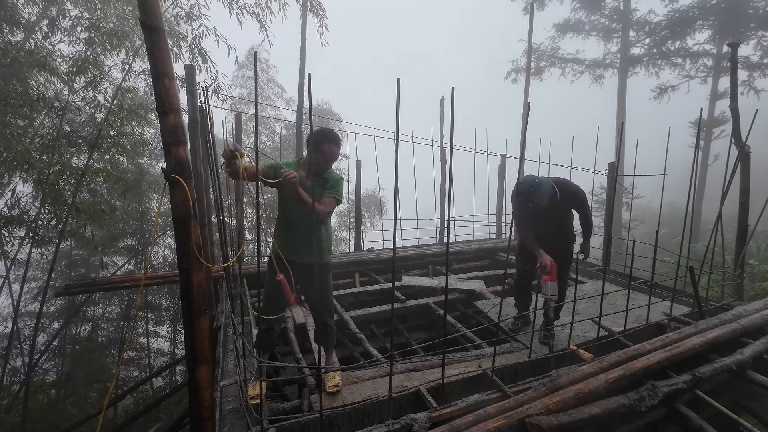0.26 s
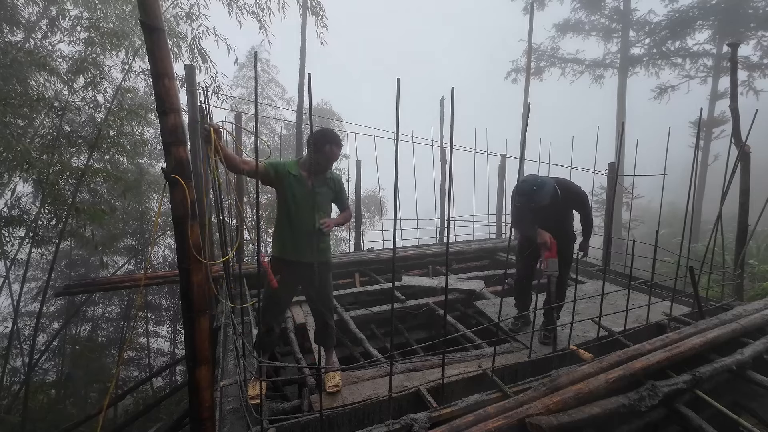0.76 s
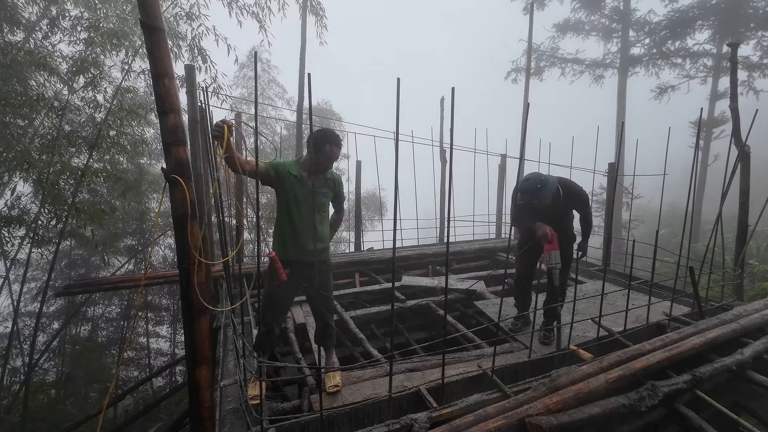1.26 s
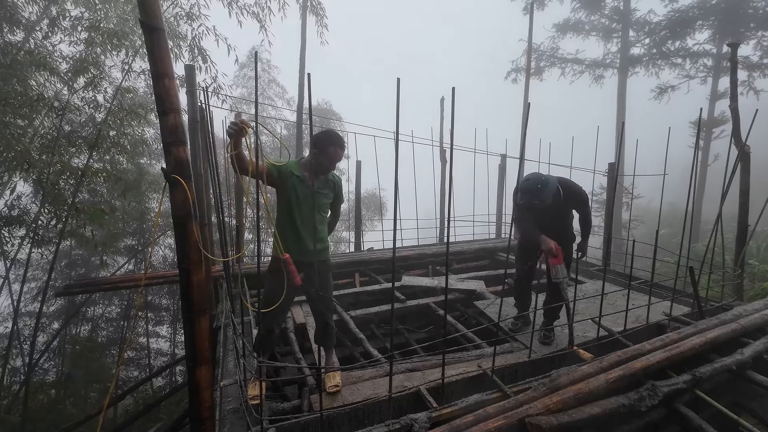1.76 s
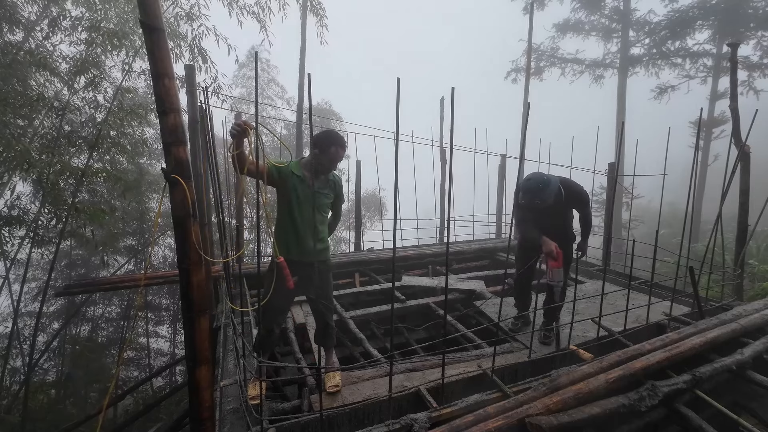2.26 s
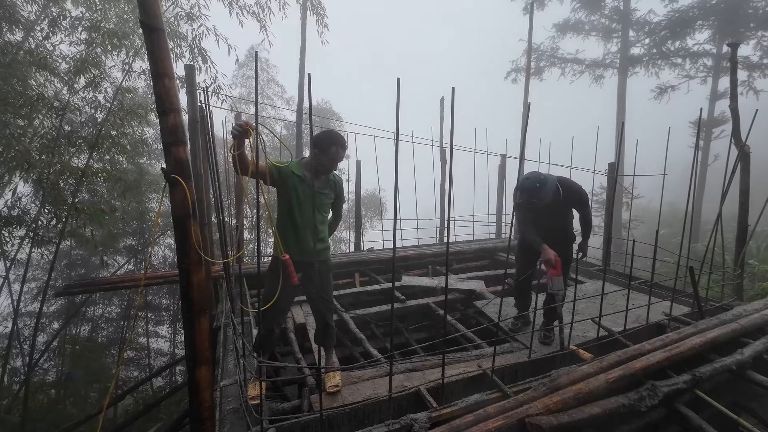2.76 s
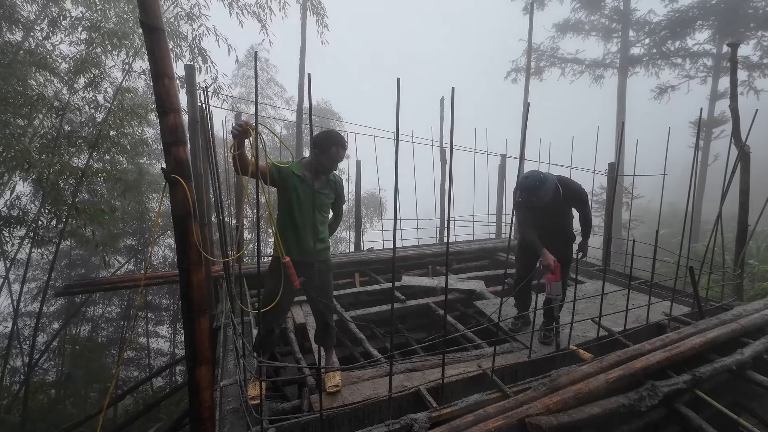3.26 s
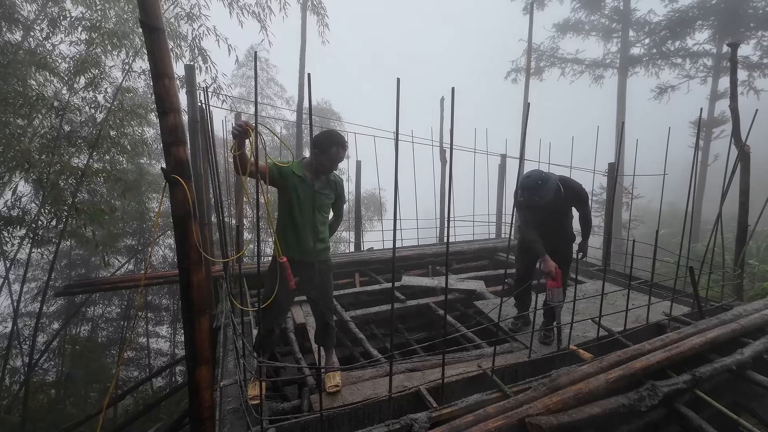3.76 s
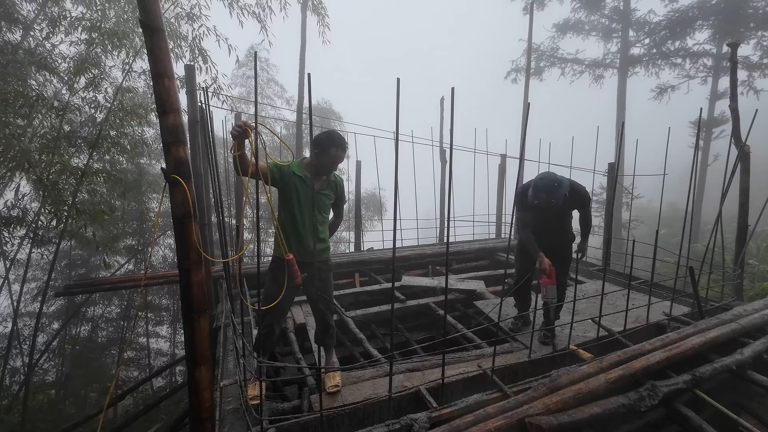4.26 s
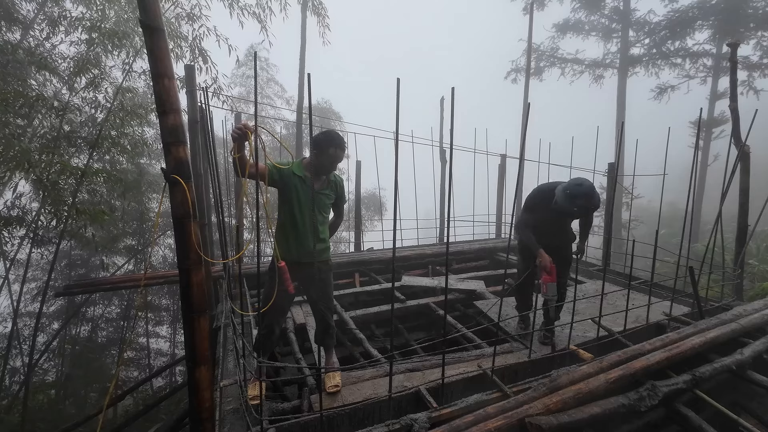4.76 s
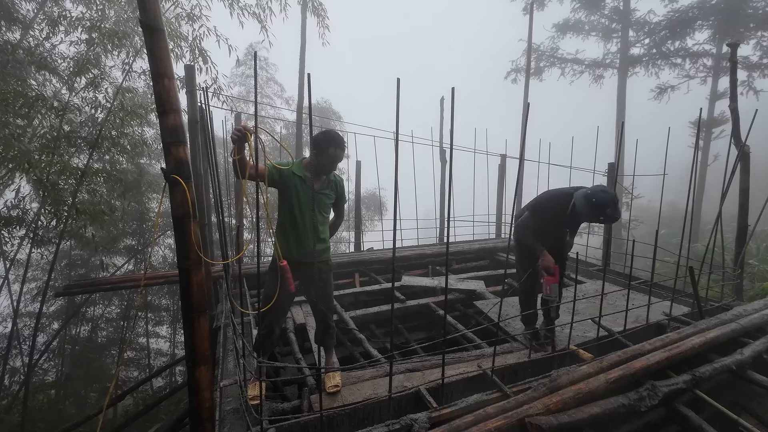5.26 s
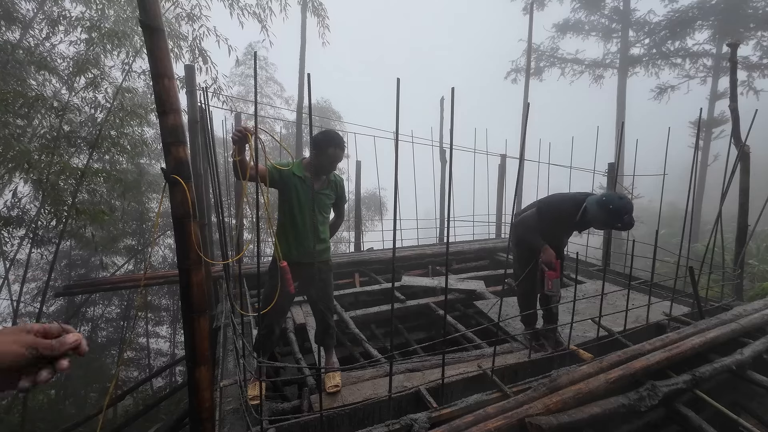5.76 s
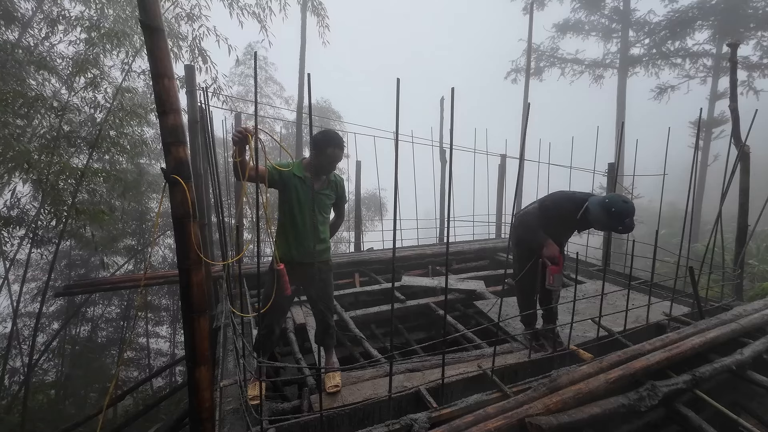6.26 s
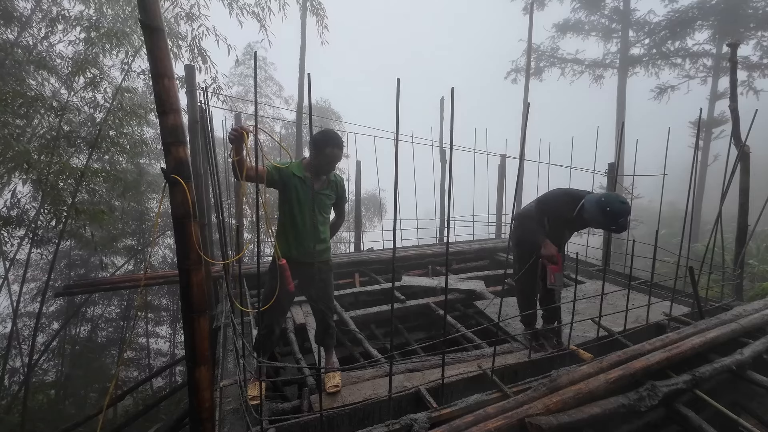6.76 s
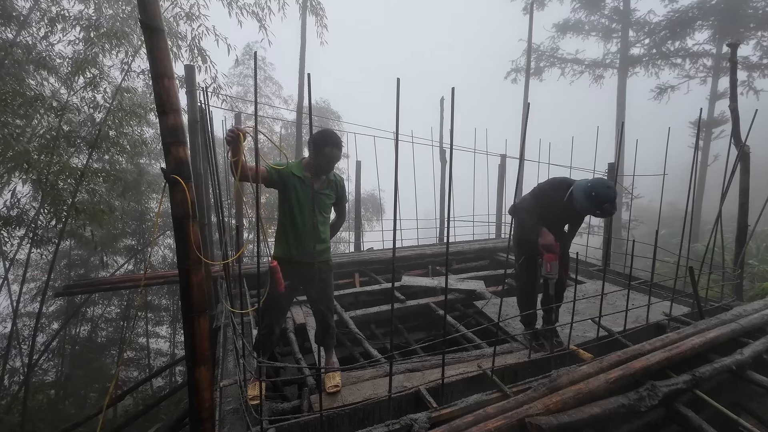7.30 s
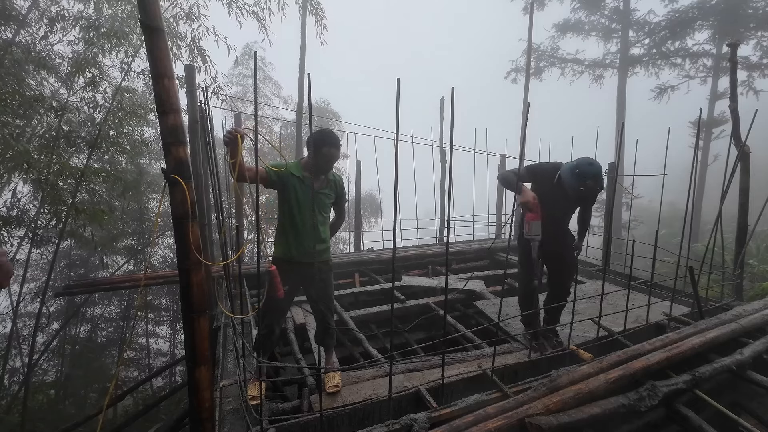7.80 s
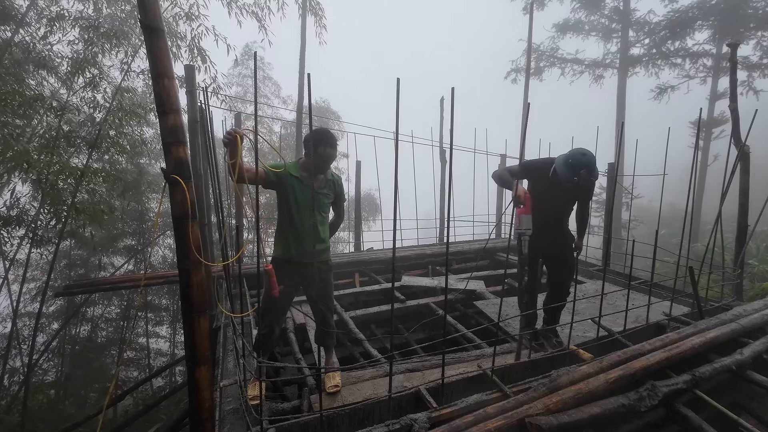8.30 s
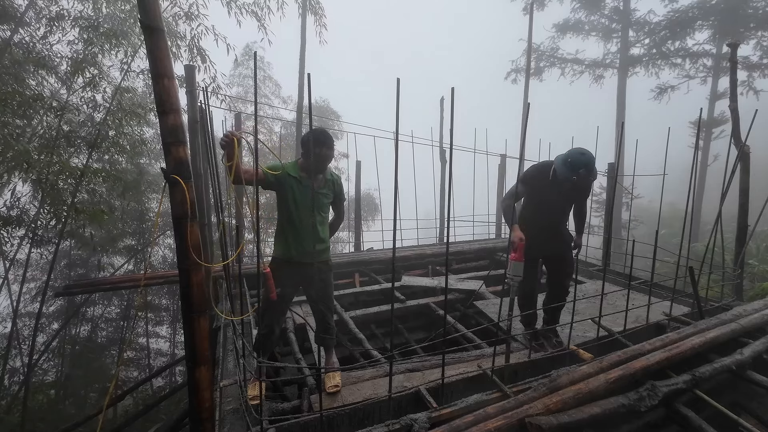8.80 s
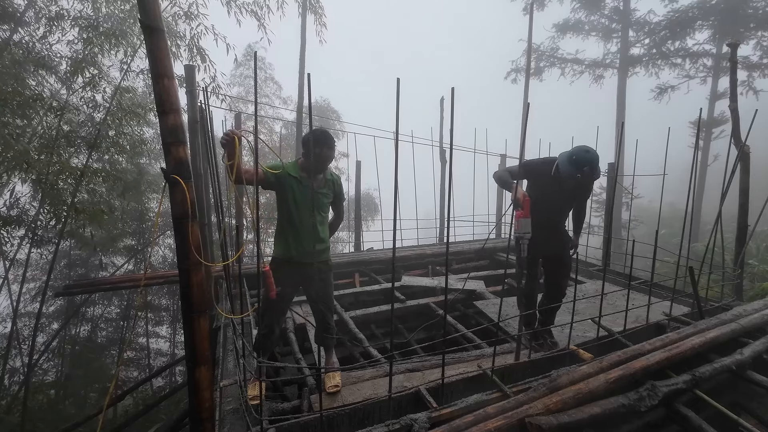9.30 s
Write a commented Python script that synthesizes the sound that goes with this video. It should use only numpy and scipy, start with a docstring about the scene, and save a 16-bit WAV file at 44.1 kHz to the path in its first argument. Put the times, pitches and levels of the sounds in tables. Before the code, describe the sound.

Repeated whining surges of a concrete vibrator, with low formwork hum, later harsh hissing rasp, rattling metal and a small engine chugging farther off outdoors.

```python
"""A handheld electric concrete vibrator is already running, the first of six pulls on its trigger. Its
eccentric shaft runs up, coasts down and hums where it touches the formwork; the geared armature whines, the
brushes hiss and squeal, and rasping bands shift in pitch once the tool is raised. A small single-cylinder
engine chugs steadily further off, with light metal jingling in time. Loose metal rattles, dull knocks on the
boards and faint outdoor air complete the building site."""
import sys
import numpy as np
from scipy import signal
from scipy.fft import rfft, irfft, next_fast_len
from scipy.io import wavfile
from scipy.ndimage import uniform_filter1d

SR = 44100
rng = np.random.default_rng(int(sys.argv[2]) if len(sys.argv) > 2 else 0)


def digitize_waveform(pressure):
    """Quantize a signal to 16-bit integers and store it at the path in sys.argv[1].

    Rows of a 2-D input are taken as channels; values are limited to [-1, 1].
    """
    field = np.atleast_2d(pressure).T
    bounded = np.clip(field, -1, 1)
    quanta = np.round(bounded * 32767).astype(np.int16)
    wavfile.write(sys.argv[1], SR, quanta)


N = 420713

# spectrum of ringing light metal: pitch_hz, relative_db
METAL_SPECTRUM = [(500, -10.5), (2800, -7), (4300, 2), (5500, -1.5), (6600, 4), (8000, 7.5), (9500, -4.5),
                  (15000, -23)]
# trigger pulls: on_s, off_s, shaft_hz reached at release;
# at REFERENCE_HZ and before trims: brush_db, air_db, squeal_db, whine_db;
# growth with speed: noise_db_per_octave, whine_db_per_octave
TRIGGER_PULLS = [(-0.16, 0.369, 217, -35, -37.5, -37, -35, 5.5, 28),
                 (1.835, 2.064, 190.6, -35, -38, -37, -40, 6.5, 28),
                 (2.745, 3.062, 211.3, -37, -38, -36, -37.5, 4.3, 28),
                 (6.15, 6.679, 218.9, -31, -37.5, -36.5, -49, 12, 24),
                 (7.27, 7.358, 196.2, -32.5, -42, -35, -29, 5, 40),
                 (8.58, 9.52, 244, -32, -49, -47, -38.5, 10.3, 44)]
GEAR_RATIO = 7.34  # armature turns per shaft turn


def undb(db):
    """Decibels to gain."""
    return np.exp(np.asarray(db) * (np.log(10) / 20))


def unit(x):
    """Scale to rms 1."""
    return x / np.sqrt(np.mean(np.square(x)))


def clock():
    """Time of each sample in seconds."""
    return np.arange(N) / SR


def curves(table):
    """The columns of a table after its time column, joined by straight lines."""
    s, *columns = np.transpose(table)
    return [np.interp(clock(), s, column) for column in columns]


def noise():
    """White noise."""
    return rng.standard_normal(N)


def walk(rate):
    """Smooth random drift of rms 1, with a new target rate times per second."""
    step = max(int(SR / rate), 2)
    targets = np.repeat(rng.standard_normal(N // step + 1), step)
    smooth = uniform_filter1d(uniform_filter1d(targets, step), step)
    return unit(smooth[:N])


def colour(x, points):
    """Pass a sound through a body with the given spectrum; rms 1."""
    hz, db = np.transpose(points)
    size = next_fast_len(N)
    f = np.maximum(np.fft.rfftfreq(size, 1 / SR), 1)
    gain = undb(np.interp(np.log(f), np.log(hz), db))
    return unit(irfft(rfft(x, size) * gain, size)[:N])


def turns(hz):
    """Revolutions made so far."""
    return np.cumsum(hz) / SR


def bell(distance, half):
    """A bell-shaped swell around distance 0."""
    return np.exp(-.5 * (distance / half) ** 2)


def noise_band(hz, width_hz):
    """A band of noise that moves in pitch: slow noise carried to the wanted pitch; rms 1."""
    lowpass = signal.butter(2, width_hz / 2, fs=SR, output="sos")
    sway = signal.sosfilt(lowpass, noise() + 1j * noise())
    return unit(np.real(sway * np.exp(2j * np.pi * turns(hz))))


def site_air():
    """The faint air of the open site: broad noise whose level drifts slowly."""
    # pitch_hz, relative_db
    air_spectrum = [(25, -24), (60, -5), (110, -4), (180, -14), (400, 17), (1500, -8), (12000, -22)]
    return undb(-60.5 + 0.83 * walk(2.1)) * colour(noise(), air_spectrum)


def from_place(cycle, place):
    """Signed distance to a place in the engine cycle, as a share of the cycle."""
    return (cycle - place + .5) % 1 - .5


def tap(cycle, place, decay):
    """A sharp blow at one place of every engine cycle; decay is a share of the cycle."""
    return np.exp(-((cycle - place) % 1) / decay)


def engine():
    """Each four-stroke cycle repeats the same thuds; its clatter is partly repeated and mostly fresh."""
    # working speed: time_s, cycles_per_s
    engine_rate = [(0, 15.66), (1, 15.61), (2.7, 15.6), (3.5, 15.76), (4.4, 15.62), (5.3, 15.62),
                   (6.2, 15.52), (7.2, 15.74), (8.2, 15.66), (9.54, 15.7)]
    # layer levels: time_s, clatter_db, valve_tick_db, exhaust_drone_db
    engine_levels = [(0, -48, -34, -43), (1.5, -50.5, -39, -46.5), (3, -51.5, -39.5, -43.5),
                     (4.1, -54.5, -41, -44), (4.7, -46.5, -33, -49), (5.5, -43, -37, -50),
                     (6.6, -43.5, -37, -59.5), (7.8, -44, -34.5, -48.5), (8.6, -45, -34, -47.5),
                     (9.54, -40, -45, -39.5)]
    # ringing thuds: place in the cycle (0-1), half_length_s, pitch_hz, level_db
    thud_table = [(0.91, 0.0039, 297, -36), (0.57, 0.0031, 297, -39), (.39, 0.0015, 342.6, -38),
                  (0.36, 0.0092, 117.2, -52), (0.19, 0.0078, 845, -47)]
    # engine block spectrum: pitch_hz, relative_db
    block_spectrum = [(60, -30), (120, -10), (180, -20), (280, -1.5), (400, -6), (520, -24.5), (700, -1.5),
                      (860, 1.5), (1100, -6), (1380, -2), (1650, -8), (1900, -5.5), (2400, -16),
                      (6000, -65)]
    # exhaust pipe spectrum: pitch_hz, relative_db
    exhaust_spectrum = [(80, -19), (120, -1.5), (180, -50.5), (260, 0), (350, 0), (480, -1), (560, -7.5),
                        (625, 9.5), (760, -10), (1100, -39), (3000, -43)]

    rate, = curves(engine_rate)
    clatter_db, tick_db, drone_db = curves(engine_levels)
    cycle = turns(rate)
    count = int(SR / rate[0])  # samples in one cycle

    def thud(place, half_s, hz):
        """A short ring with the same waveform in every cycle, at a wavering level."""
        distance = from_place(cycle, place)
        ring = np.sin(2 * np.pi * hz * (distance + place) / rate)
        return undb(1.1 * walk(16)) * bell(distance, half_s * rate) * ring

    def churn(fresh):
        """Roughness that comes back every cycle, mixed with fresh noise of the given strength."""
        repeated = rng.standard_normal(count)[(cycle % 1 * count).astype(int)]
        return repeated + fresh * noise()

    thuds = sum(undb(db) * thud(place, half_s, hz) for place, half_s, hz, db in thud_table)
    valve = undb(tick_db) * thud(.485, .0016, 1390)
    blows = 0.64 + 1.27 * tap(cycle, .2, 0.29) * undb(3.0 * walk(16))
    clatter = undb(clatter_db) * colour(blows * churn(fresh=1.43), block_spectrum)
    puffs = 0.8 + bell(from_place(cycle, 0.48), 0.14)
    drone = undb(drone_db) * colour(churn(fresh=0.4) * puffs, exhaust_spectrum)
    # light metal parts jingle twice a cycle, at a wavering strength
    strikes = uniform_filter1d(tap(cycle, .215, .15) + .6 * tap(cycle, .37, .1), size=260)
    jingle = undb(-47) * colour(noise() * strikes * undb(2 * walk(16)), METAL_SPECTRUM)
    return thuds + valve + clatter + drone + jingle


def rattles():
    """Loose metal chatters: a sharp crack and a short buzzing tail."""
    # time_s, level_db before the 5 dB trim
    rattle_hits = [(1.3573, -32), (1.425, -26.5), (2.6404, -25.5), (4.4915, -25), (4.556, -20.5),
                   (4.6179, -24), (4.6765, -26.5), (5.188, -30.5), (5.255, -25.5), (5.303, -27.5),
                   (5.8326, -30), (6.0252, -32), (6.1578, -26.5), (6.2186, -22.5), (7.365, -25),
                   (7.393, -19.5)]
    strength = np.zeros(N)
    for s, db in rattle_hits:
        first = int(s * SR)
        age = clock()[:max(N - first, 0)][:4000]
        crack, tail = np.exp(-age / 0.0046), 0.29 * np.exp(-age / 0.03)
        strength[first:][:len(age)] += undb(db - 5) * (crack + tail)
    return strength * colour(noise(), METAL_SPECTRUM)


def knocks():
    """Dull, heavily damped bumps on the boards."""
    # time_s, level_db, pitch_hz
    knock_hits = [(4.56, -43, 119.9), (7.391, -20, 203), (8.094, -26, 151.4)]
    t = clock()
    return sum(undb(db) * bell(t - s, 0.0039) * np.sin(2 * np.pi * hz * (t - s))
               for s, db, hz in knock_hits)


def shaft_speed():
    """Under power the shaft runs up; released, it coasts against a drag that grows with speed squared."""
    rest_hz, spin_up_s = 100, 0.25  # speed before the first pull; time constant under power
    drag_per_turn = 0.00465  # share of its speed that the coasting shaft loses each turn
    t = clock()
    hz = np.full(N, float(rest_hz))
    for on, off, peak_hz, *_ in TRIGGER_PULLS:
        start_hz = np.interp(on, t, hz)
        powered_s = np.clip(t - on, 0, off - on)
        rise = np.expm1(-powered_s / spin_up_s) / np.expm1(-(off - on) / spin_up_s)
        coast = 1 + drag_per_turn * peak_hz * np.maximum(t - off, 0)
        hz = np.where(t >= on, (start_hz + (peak_hz - start_hz) * rise) / coast, hz)
    return hz


def motor_levels(hz):
    """Brush, air, squeal and whine in dB: each pull sets them anew, and they grow with speed."""
    REFERENCE_HZ = 200  # shaft speed at which the table's levels hold
    regrip_s = 0.2  # the tool settles into a new position at each pull
    fan_growth, squeal_growth = 3, 4  # dB per octave gained beyond the brushes
    ends = [pull[0] for pull in TRIGGER_PULLS[1:]] + [N / SR]
    held = []
    for pull, end in zip(TRIGGER_PULLS, ends):
        held += [(pull[0] + regrip_s, *pull[3:]), (end, *pull[3:])]
    brush_db, air_db, squeal_db, whine_db, growth, whine_growth = curves(held)
    octaves = np.log2(hz / REFERENCE_HZ)
    return (brush_db + growth * octaves, air_db + (growth + fan_growth) * octaves,
            squeal_db + (growth + squeal_growth) * octaves, whine_db + whine_growth * octaves)


def shaking(hz):
    """Strength of hum and rumble: the formwork shakes while the tool touches it, far harder at speed."""
    # tool against the formwork: start_s, end_s, hum_db, rumble_db (before response and trims)
    contacts = [(-0.1, 0.633, -8, -46), (0.656, 0.825, -11, -51), (0.952, 1.35, -20, -58),
                (1.923, 2.018, -14.5, -50.5), (2.02, 2.752, -10.5, -48), (2.804, 3.17, -13, -49),
                (3.183, 3.76, -10.5, -47.5), (3.891, 4.0, -5.5, -47.5), (7.387, 7.457, -13.5, -45.5),
                (7.467, 7.668, -16.5, -48.5), (7.712, 7.83, -18.5, -48), (8.79, 8.97, -45, -74),
                (8.98, 9.166, -24.5, -52), (9.179, 9.393, -18.5, -47), (9.42, 9.6, -38, -53)]
    # how the formwork answers the shaft: shaft_hz, hum_gain_db, rumble_gain_db
    response = [(100, -40, -18), (126, -31.5, -13), (150.6, -13.5, -3.5), (179.4, -4.5, -2),
                (190, -1, -0.5), (244, 1.5, -2)]
    press_s, lift_s = 0.035, 0.053  # time to make contact and to lose it
    t, force, shake = clock(), 0, 0
    for start, end, hum_db, rumble_db in contacts:
        pressed = np.clip(np.minimum((t - start) / press_s, (end - t) / lift_s) + .5, 0, 1)
        force = force + undb(hum_db) * pressed
        shake = shake + undb(rumble_db) * pressed
    speeds, hum_gain_db, rumble_gain_db = np.transpose(response)
    force = force * undb(np.interp(hz, speeds, hum_gain_db) + 0.8 * walk(22))
    shake = shake * undb(np.interp(hz, speeds, rumble_gain_db) + 2.4 * walk(14))
    return force, shake


def hum(hz, force, shake):
    """The unbalanced shaft gives a nearly pure tone; its uneven knocking makes formwork buzz and rumble."""
    # overtones: multiple of shaft speed, relative_db
    hum_orders = [(2, 4), (3, -5), (4, -16)]
    # buzzing boards: pitch_hz, relative_db
    board_spectrum = [(200, -35), (300, -5.5), (380, 0), (425, -6.5), (480, -3), (560, -7), (1000, 5)]
    # rumble: pitch_hz, relative_db
    rumble_spectrum = [(25, -15), (70, -8.5), (140, 1), (280, 2.5), (400, -8.5), (600, -25), (1200, -53),
                       (3000, -50)]
    angle = 2 * np.pi * turns(hz * (1 + 0.0042 * walk(45)))
    tone = np.sqrt(2) * force * undb(.35 * walk(60)) * np.sin(angle)
    overtones = sum(undb(db) * noise_band(round(k) * hz, width_hz=31.7) for k, db in hum_orders)
    buzz = undb(-42.5) * colour(force ** .5 * overtones, board_spectrum)
    rumble = undb(15.5) * shake * colour(noise(), rumble_spectrum)
    return tone + buzz + rumble


def whine(hz, db):
    """The geared armature's tones light up as they cross the modes of the case."""
    # tones: multiple of armature speed, relative_db
    whine_orders = [(2, -17), (3, 0.5), (4, 8.5), (5, 8.5)]
    # modes of the case: pitch_hz, relative_db
    case_spectrum = [(1800, -6), (2600, 11.5), (3300, 3), (3900, -18), (4650, 4.5), (5350, 6), (5750, 2.5),
                     (6350, 5), (6800, 2), (7400, 3.5), (8100, -5), (9000, -8)]
    from_hz, fade_hz = 145, 7.7  # the whine dies out below this shaft speed, over this range
    angle = 2 * np.pi * turns(GEAR_RATIO * hz * (1 + .006 * walk(450)))
    tones = sum(undb(order_db + 3 * walk(40) + 2 * walk(12)) * np.sin(round(k) * angle)
                for k, order_db in whine_orders)
    fast_enough = 1 / (1 + np.exp((from_hz - hz) / fade_hz))
    return undb(db) * fast_enough * colour(tones, case_spectrum)


def hiss(brush_db, air_db):
    """Brushes scrape and the fan blows, under a separate layer of the highest hiss."""
    # brush noise: pitch_hz, relative_db
    brush_spectrum = [(2000, -19), (2450, -11), (2900, -13), (3600, -8.5), (4400, -10.5), (5450, -5.5),
                      (6100, -5), (6900, 0), (7300, -2.5), (7700, 1.5), (8100, 2), (8800, -7), (10500, -18),
                      (15000, -42)]
    # fan air: pitch_hz, relative_db
    fan_spectrum = [(200, -27), (400, -2), (700, 8.5), (1100, -1), (1850, 3), (2150, 0.5), (2450, 7.5),
                    (2800, 2.5), (4000, -0.5), (8000, -18)]
    # highest hiss: pitch_hz, relative_db
    spray_spectrum = [(6000, -20), (9500, 9.5), (11500, 1.5), (15000, -4)]
    # its level, tool lowered and then raised: two lists of time_s, level_db before trim
    spray_levels = [
        [(0.0, -54), (0.27, -47), (1.81, -82), (2.04, -54), (2.78, -64), (2.97, -50), (4.02, -67), (4.29, -69),
         (4.3, -60)],
        [(6.3, -59), (6.68, -38.5), (7.35, -53), (7.39, -43), (7.48, -49), (8.32, -47), (8.5, -64), (9.42, -36),
         (9.54, -38)],
    ]
    spray_db, = curves(np.concatenate(spray_levels))
    brush = undb(brush_db) * colour(noise(), brush_spectrum)
    air = undb(air_db) * colour(noise(), fan_spectrum)
    spray = undb(spray_db + 1.3) * colour(noise(), spray_spectrum)
    return brush + air + spray


def brush_squeal(squeal_db):
    """The brushes squeal in a narrow, wavering band that flares up at times."""
    # flares: middle_s, half_length_s, level_db
    squeal_flares = [(0.636, 0.051, -29), (0.928, 0.046, -37.5), (2.98, 0.07, -35), (6.684, 0.05, -35.5),
                     (7.529, 0.038, -30), (7.77, 0.05, -28.5), (8.445, 0.05, -36.5), (9.32, 0.065, -33),
                     (9.469, 0.07, -27)]
    t = clock()
    flares = sum(undb(db) * bell(t - s, half) for s, half, db in squeal_flares)
    steady = undb(squeal_db - 2.5 + 3.0 * walk(9))
    return np.hypot(steady, flares) * noise_band(7300 + 45 * walk(9), width_hz=173)


def lifted():
    """Fade from 0 to 1 as the tool is raised."""
    raised_s, raise_s = 6.22, 0.34  # start and duration of the raising
    return np.clip((clock() - raised_s) / raise_s, 0, 1)


def raised_rasp(hz):
    """Three broad rasping bands shift in pitch and level once the tool is raised."""
    # each table: time_s, pitch_hz, level_db before trim
    lower_band = [(6.25, 3000, -51), (6.33, 2620, -43), (6.43, 2945, -42.5), (6.69, 2970, -36),
                  (7.0, 2620, -45), (7.23, 3390, -59), (7.32, 2810, -51), (7.47, 2620, -34),
                  (7.65, 3260, -34), (7.76, 2997, -37), (7.84, 3280, -33), (7.96, 3460, -43.5),
                  (8.58, 3340, -46.5), (9.03, 3380, -29), (9.45, 3560, -37), (9.54, 3540, -36)]
    middle_band = [(6.25, 5200, -52), (6.28, 5200, -54), (6.71, 5040, -31), (7.27, 4500, -39.5),
                   (7.38, 5560, -43), (7.48, 5050, -33), (8.36, 5040, -41.5), (8.52, 5180, -65),
                   (9.4, 5220, -38), (9.54, 5450, -39)]
    upper_band = [(6.25, 7490, -50), (6.7, 7760, -21.5), (6.91, 7540, -29), (7.32, 7390, -39),
                  (7.4, 7130, -21), (7.6, 7610, -25), (7.71, 7380, -34), (7.74, 7360, -25),
                  (8.11, 7960, -35), (8.47, 7460, -33.5), (8.55, 7450, -38.5), (9.06, 7487, -35),
                  (9.47, 7200, -21), (9.54, 7360, -20)]
    low_hz, low_db = curves(lower_band)
    mid_hz, mid_db = curves(middle_band)
    top_hz, top_db = curves(upper_band)
    rasp = undb(low_db - 2.0) * noise_band(low_hz, width_hz=630)
    rasp += undb(mid_db - 3.0) * noise_band(mid_hz, width_hz=790)
    rasp += undb(top_db - 4.0) * noise_band(top_hz, width_hz=990)
    # the armature's second tone stands out as it sweeps through the lowest band
    armature_hz = 2 * GEAR_RATIO * hz
    in_band = 1 / (1 + ((armature_hz - low_hz) / 450) ** 2)
    rasp += undb(low_db - 4) * in_band * noise_band(armature_hz, width_hz=170)
    return lifted() * rasp


def motor(hz, brush_db, air_db, squeal_db):
    """Hiss, squeal and rasp swell together once a shaft turn, with random roughness on top."""
    scrape = undb(0.39 * np.sin(2 * np.pi * turns(hz)) + 1.04 * walk(130) + 0.5 * walk(9))
    return scrape * (hiss(brush_db, air_db) + brush_squeal(squeal_db) + raised_rasp(hz))


def vibrator():
    """One shaft speed drives the hum, the whine and the motor noise."""
    hz = shaft_speed()
    brush_db, air_db, squeal_db, whine_db = motor_levels(hz)
    force, shake = shaking(hz)
    return hum(hz, force, shake) + whine(hz, whine_db) + motor(hz, brush_db, air_db, squeal_db)


def scene():
    """Site air, engine, loose metal, knocks and the vibrator in front, in mono."""
    return (site_air() + engine() + rattles() + knocks() + vibrator())[None]


def record(dry):
    """A steep low-pass cuts the top above 15.6 kHz."""
    return signal.sosfilt(signal.ellip(10, .2, 80, 15600, fs=SR, output="sos"), dry)


dry = scene()
out = record(dry)
digitize_waveform(out)
```